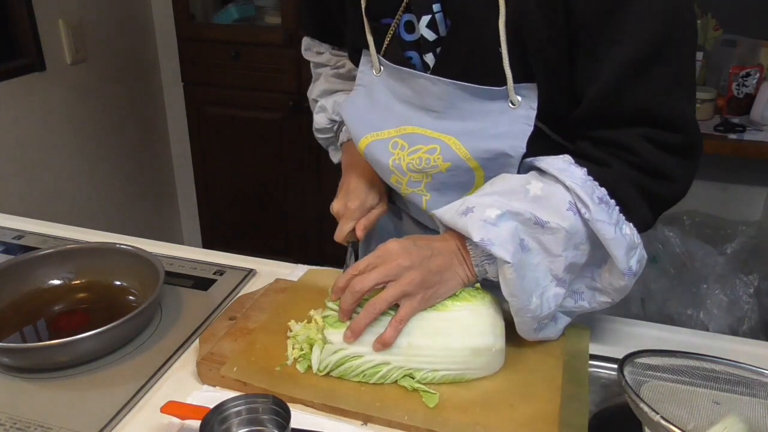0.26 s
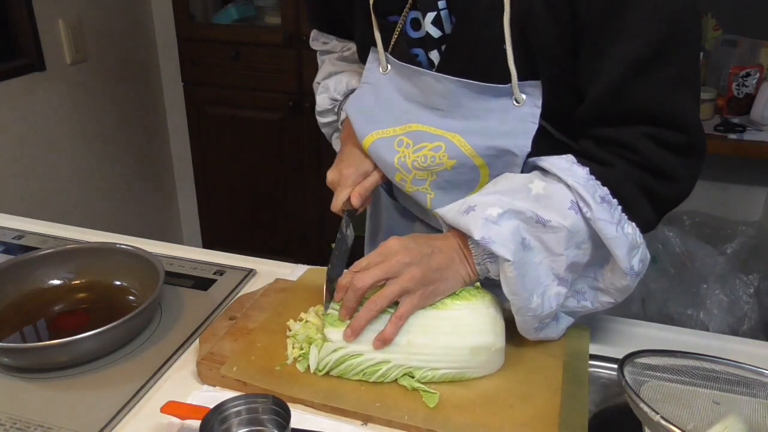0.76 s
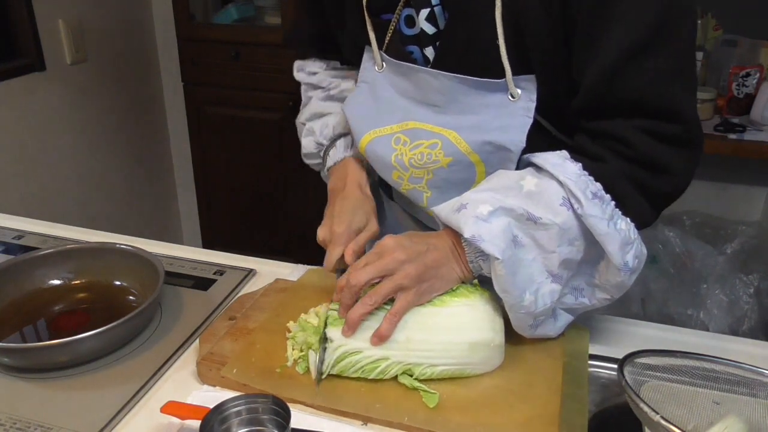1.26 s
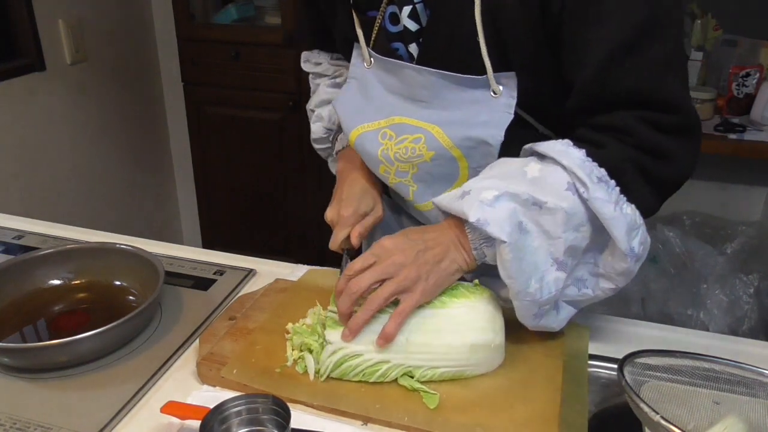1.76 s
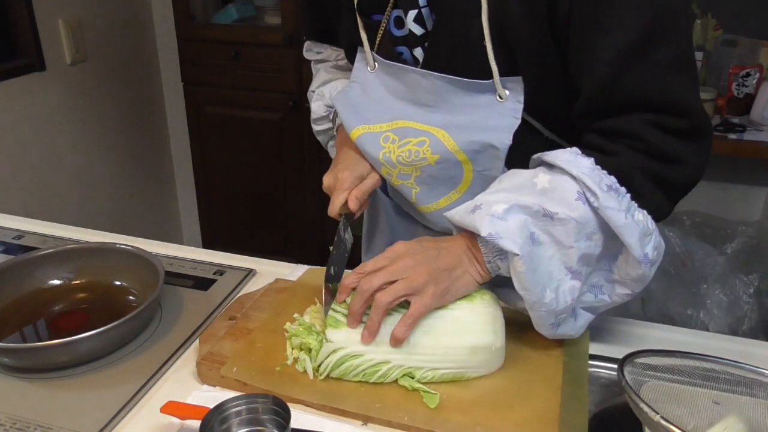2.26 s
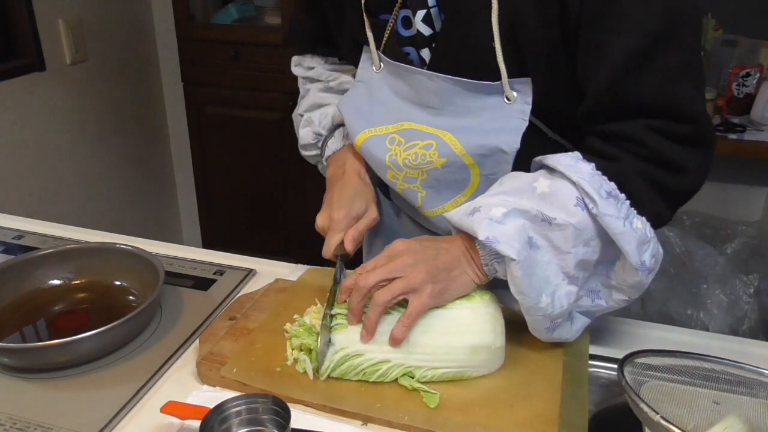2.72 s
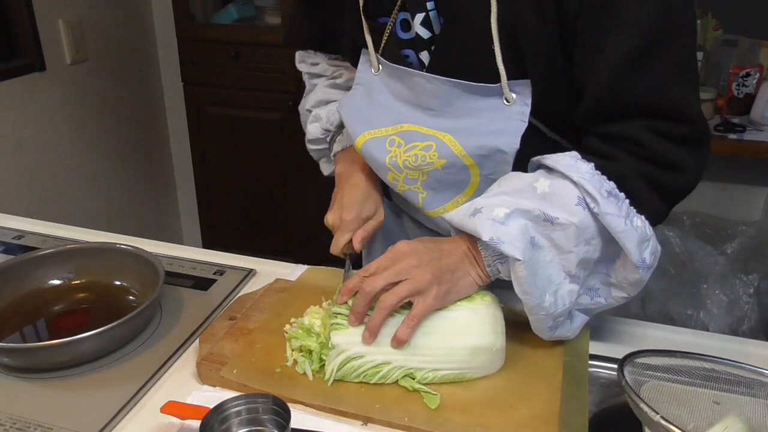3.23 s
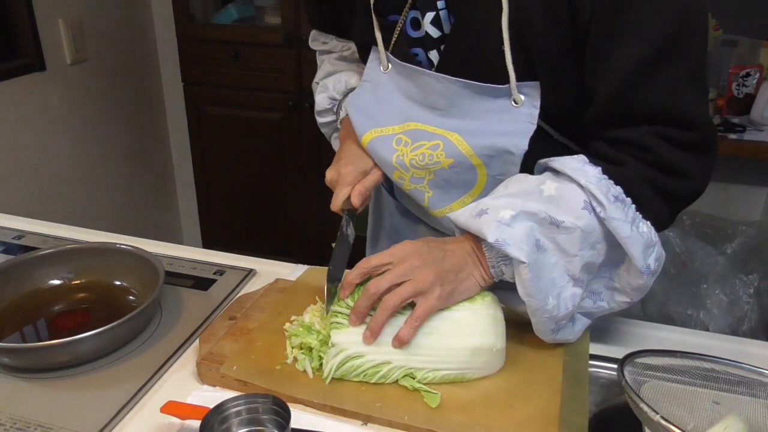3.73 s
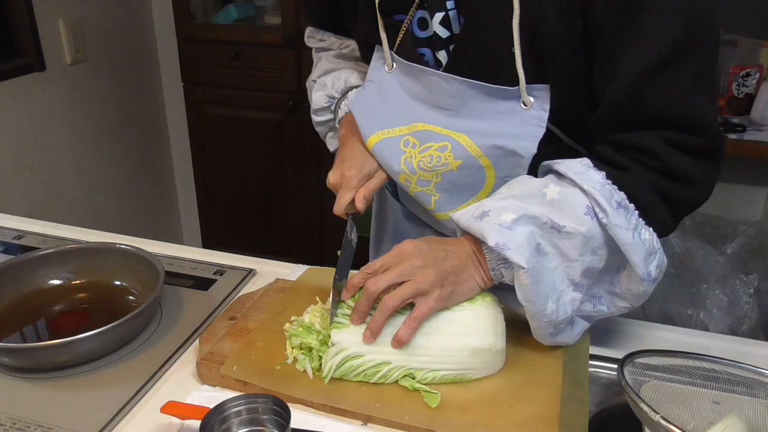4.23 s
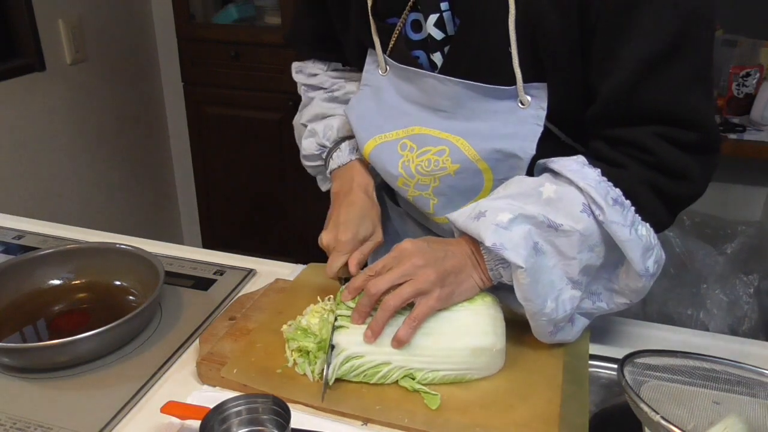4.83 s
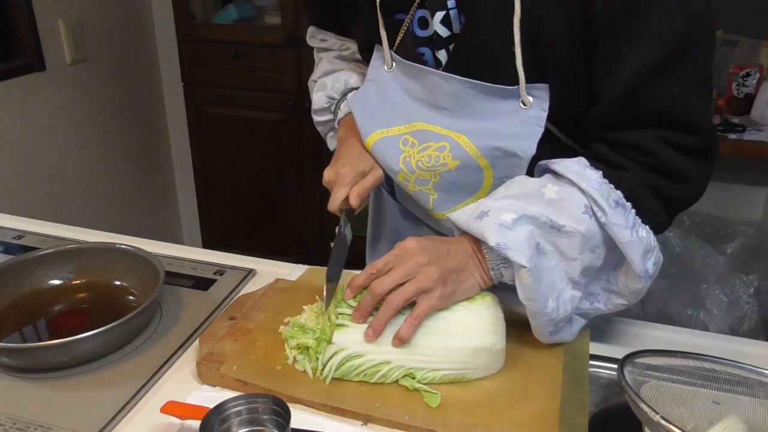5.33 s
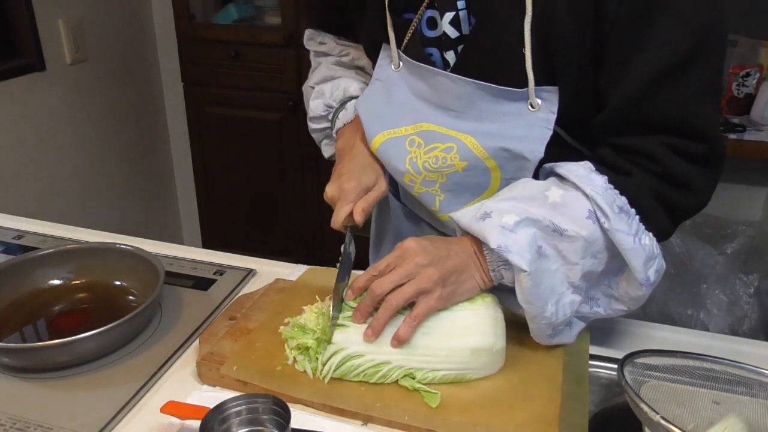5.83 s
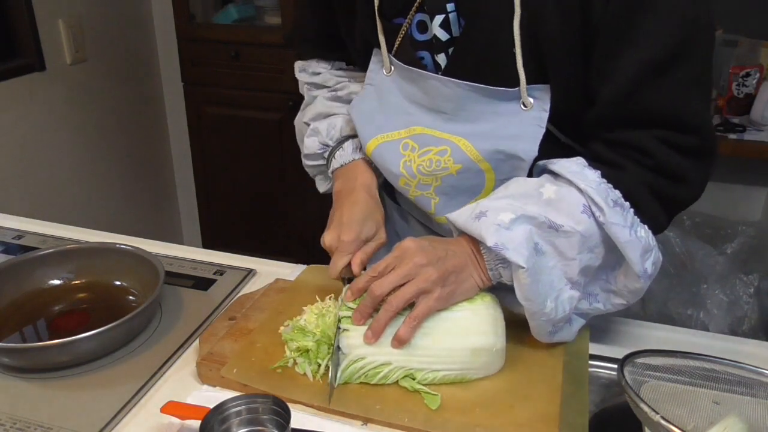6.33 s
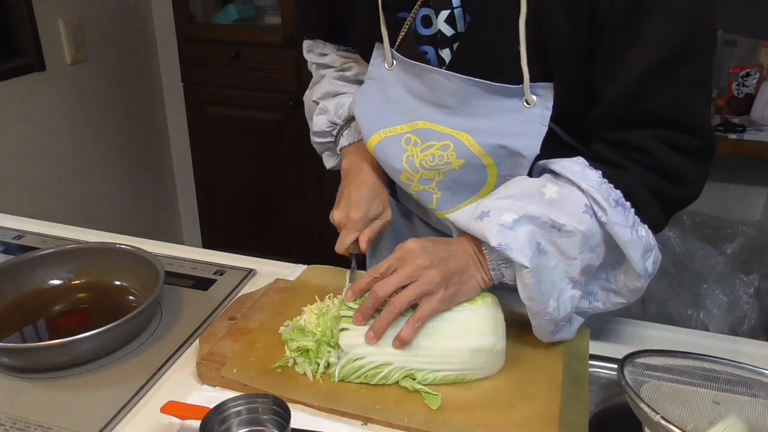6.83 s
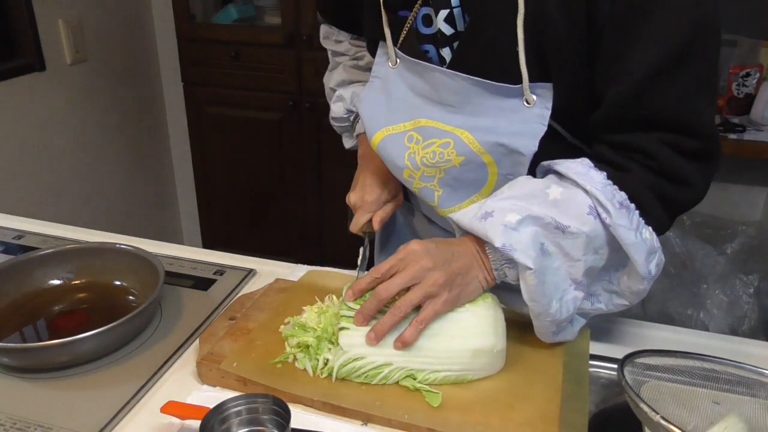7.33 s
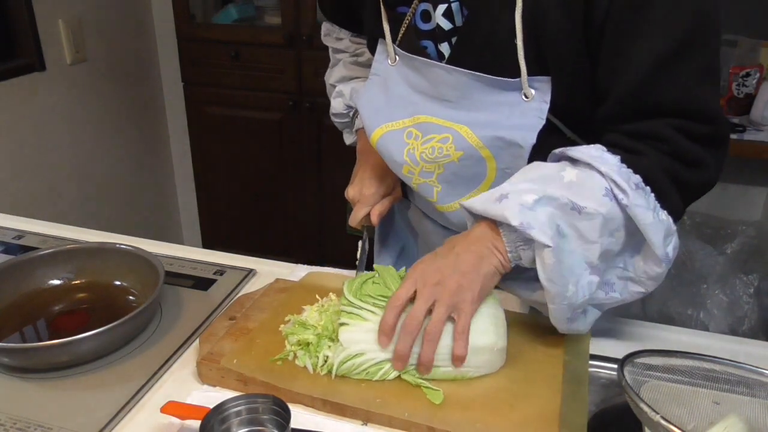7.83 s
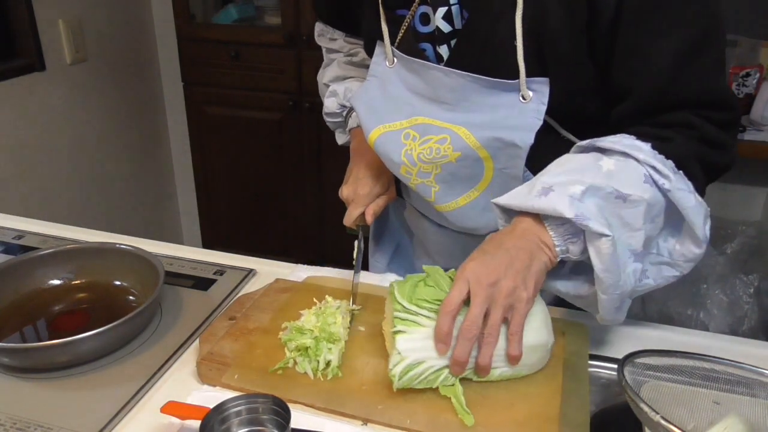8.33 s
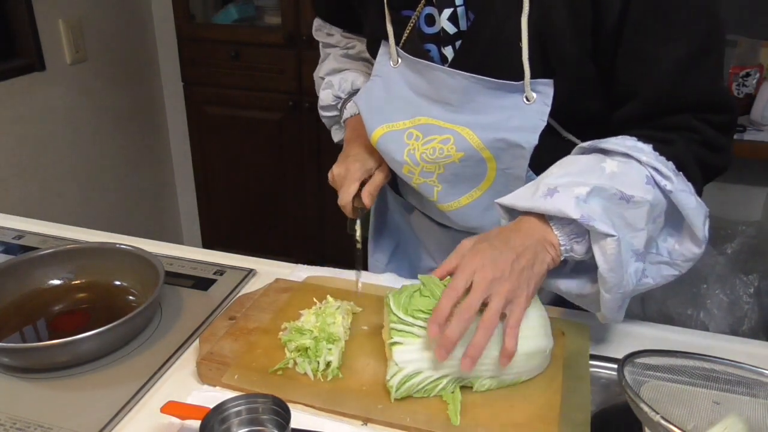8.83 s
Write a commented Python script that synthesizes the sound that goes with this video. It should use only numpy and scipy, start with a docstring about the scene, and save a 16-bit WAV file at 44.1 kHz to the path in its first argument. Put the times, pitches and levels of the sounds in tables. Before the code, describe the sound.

Close stereo view of cabbage being cut on a wooden board in a small, lightly reverberant kitchen, over a constant low ventilation rush with faint hiss. At 0-0.5 s a soft scrape and small squeaks, then scattered leaf crackles. The first slow stroke at 1.0-1.4 s is bright and crunchy, deepening into board rumble, with a muffled knock at 1.5. A dragging rustle leads to the second cut at 2.7-3.0, followed by a squeak and a scrape to 3.4. Quiet ticks and snaps precede the third, shorter cut at 4.5, ending in a loud, hard woody chop at 4.76. After a lull, the fourth long crunch runs 5.9-6.3. Rubbing, leaf snaps and low squeaks follow at 6.5-7.0, then a cluster of light knocks at 7.2-7.35. Faint rustling fades down, with a soft dull double tap near 8.7.

```python
"""A kitchen knife shreds a head of cabbage on a wooden board in four slow strokes, in a small kitchen.
Noise from random fractures, coloured per material, makes bursting cells, tearing ribs, rubbing and board rumble.
Single leaves snap as noise bursts; knocks are decaying board modes; squeaks and thuds are unsteady sines.
One stroke ends in a hard chop; then the head is pushed aside with a rustle and a few soft knocks.
Filtered noise echoes give counter and room; a steady low rush of ventilation lies underneath."""
import sys
import numpy as np
from scipy import signal
from scipy.fft import rfft, irfft, next_fast_len
from scipy.io import wavfile
from scipy.ndimage import map_coordinates

SR = 44100
rng = np.random.default_rng(int(sys.argv[2]) if len(sys.argv) > 2 else 0)


def log_audio(samples):
    """Write samples as a 16-bit WAV file to the path given in sys.argv[1]."""
    # one column per channel
    frames = np.atleast_2d(samples).T
    # limit to full scale, then quantise
    limited = np.clip(frames, -1, 1)
    pcm = np.round(limited * 32767).astype(np.int16)
    wavfile.write(sys.argv[1], SR, pcm)


N = 399987
TIME = np.arange(N) / SR
TOP_HZ = 15850


def amp(db):
    """Decibels to gain."""
    return np.exp(np.asarray(db) * (np.log(10) / 20))


def unit(x):
    """Scale to rms 1."""
    return x / np.sqrt(np.mean(x ** 2) + 1e-20)


def peaked(x):
    """Scale to peak 1."""
    return x / np.abs(x).max()


def along(points, hz):
    """Read (Hz, value) points on a log frequency axis."""
    f, v = np.transpose(points)
    return np.interp(np.log(hz + 1), np.log(f + 1), v)


def add(track, s, sound):
    """Mix a sound into a track at time s."""
    part = track[max(round(s * SR), 0):][:len(sound)]
    part += sound[:len(part)]


def wobble(rate, size):
    """Smooth random curve, rate knots per second."""
    knots = rng.standard_normal(int(size * rate / SR) + 4)
    return map_coordinates(knots, [np.arange(size) * rate / SR])


def filtered(x, response):
    """Apply a complex response of frequency to zero-padded x."""
    n = x.shape[-1]
    m = 2 * next_fast_len(n // 2 + 4096)
    return irfft(rfft(x, m) * response(np.fft.rfftfreq(m, 1 / SR)), m)[..., :n]


def coloured(x, spectrum):
    """Causal minimum-phase filter with the given spectrum."""
    def response(hz):
        cepstrum = irfft(np.log(amp(along(spectrum, hz))))
        fold = 1 + np.sign(np.fft.fftfreq(len(cepstrum)))
        return np.exp(rfft(cepstrum * fold))
    return filtered(x, response)


def resonating(x, peaks):
    """Parallel second-order resonances of alternating sign."""
    def response(f):
        total = 0
        for k, (centre, width, db) in enumerate(peaks):
            band = 1j * f * width
            total = total + (-1) ** k * amp(db) * band / (centre * centre - f * f + band)
        return total
    return filtered(x, response)


def envelope(s, rise, hold, sag, release):
    """Gain that rises from time s, sags while held, then dies; sag and release in dB/s."""
    gain, t = np.zeros(N), TIME[:SR]
    loss_db = sag * np.clip(t - rise, 0, hold) + release * np.maximum(t - rise - hold, 0)
    add(gain, s, np.minimum(t / rise, 1) * amp(-loss_db))
    return gain


def fractures(rate, spread_db, clump_db):
    """Tiny impulses of uneven size, clumped as the edge passes leaf after leaf."""
    happens = rng.random(N) < rate / SR
    size_db = spread_db * np.clip(rng.standard_normal(N), -2, 2) + clump_db * wobble(130, N)
    return happens * rng.choice([-1, 1], N) * amp(size_db)


# bursting cells and tearing ribs, relative spectra: [f/Hz, density/dB]
CELL_SPECTRUM = [(1500, -49), (4000, -21.5), (5800, -7.5), (7500, 1), (9300, 3.5), (11500, -0.5),
                 (14000, -6.5), (16000, -17)]
RIB_SPECTRUM = [(500, -11), (1200, -1), (1750, -1), (2900, 2), (4100, 4.5), (5500, -1), (8000, -5.5),
                (15000, -64)]
# resonances under the sliding blade and under its push on the board: [f/Hz, width/Hz, level/dB]
RUB_MODES = [(320, 70, -5), (510, 140, -1), (755, 70, -5), (885, 130, -1.5), (1130, 150, -3.5),
             (1335, 100, -4.5), (2065, 60, -5.5), (2590, 80, -15)]
PUSH_MODES = [(63, 16, -26), (89.3, 5, -6), (139.3, 25, 0.5), (151.9, 30.4, 2.5), (206.7, 74, -5),
              (234.8, 31.5, -4)]
FIBRE_DB = -7.5


def slicing():
    """Cells burst brightly, ribs tear lower, fibres tick, and the jerks of the blade shake the board."""
    cell_gain, rib_gain, rub_gain, push_gain = np.sqrt(cuts() ** 2 + drags() ** 2 + crunches() ** 2)
    bursts = fractures(rate=2500, spread_db=3.5, clump_db=2.0)
    tears = fractures(rate=1300, spread_db=4, clump_db=2)
    slips = fractures(rate=800, spread_db=1.5, clump_db=2.2)
    cell_noise = coloured(unit(bursts) + 0.5 * unit(tears), CELL_SPECTRUM)
    rib_noise = coloured(unit(tears) + 1.6 * unit(bursts), RIB_SPECTRUM)
    rub_noise = resonating(unit(slips) + 0.45 * unit(tears), RUB_MODES)
    push_noise = resonating(slips, PUSH_MODES)
    cells = amp(-1.5) * cell_gain * unit(cell_noise)
    ribs = amp(-3.0) * rib_gain * unit(rib_noise)
    rub = amp(-1.5) * rub_gain * unit(rub_noise)
    push = amp(-2.5) * push_gain * unit(push_noise)
    strings = amp(FIBRE_DB) * np.sqrt(rib_gain * rub_gain) * fibres()
    return cells + ribs + strings + rub + push


# the blade sinks through the head, relative levels:
# [t/s, time to board/s, bite height 0-1, level at board/dB,
#  extra crispness of outer leaves/dB, extra weight on board/dB]
CUTS = [(1.041, 0.38, 1, -37.5, 4.5, -2), (2.74, 0.27, 1, -36.5, -2, -1),
        (4.523, 0.222, .55, -39.5, -2, -2.5), (5.86, 0.425, 1, -38, -1, -1)]
# rows cells, ribs, rubbing, push on board: [relative level at board/dB, growth on the way down/dB, release/(dB/s)]
CUT_LAYERS = [(-1.5, 10, 404), (-4, 11, 366), (-3, 15, 352), (0.5, 16.5, 260)]
CUT_RISE_S = 0.0073


def cuts():
    """Gains of cells, ribs, rubbing and push: the deeper the blade, the harder it works and the duller it sounds."""
    power = np.zeros((4, N))
    for s, length, bite_height, db, crisp_db, weight_db in CUTS:
        height = bite_height * np.clip(1 - (TIME - s) / length, 0, 1)
        extras_db = [crisp_db * height, 0, 0, weight_db]
        for layer, (end_db, growth_db, release), extra_db in zip(power, CUT_LAYERS, extras_db):
            depth_gain = amp(db + end_db + extra_db - growth_db * height)
            layer += (depth_gain * envelope(s, CUT_RISE_S, length, 0, release)) ** 2
    return np.sqrt(power)


# blade or cabbage dragged over shreds and board, relative levels:
# [t/s, rise/s, hold/s, rubbing/dB, leaf cells/dB, push on board/dB]
DRAGS = [(0, 0.014, 0.43, -47.5, -47.5, -46.5), (0.05, 0.067, 0.095, -47, -58.5, -60),
         (1.635, 0.15, 0.073, -50.5, -50.5, -64), (2.526, 0.29, 0.12, -48.5, -41, -48),
         (3.141, 0.11, 0.13, -45, -47, -46.5), (4.354, 0.016, 0.16, -53, -51.5, -51),
         (5.05, 0.043, 0.0079, -57, -55.5, -59), (6.546, 0.27, 0.28, -46.5, -49, -48),
         (7.158, 0.13, 0.018, -47, -52, -49), (7.97, 0.033, 0.014, -58.5, -58.5, -72),
         (8.09, 0.09, 0.034, -60, -61.5, -73), (8.25, 0.057, 0.42, -64.5, -87, -62.5)]
DRAG_SAG_DB_PER_S, DRAG_RELEASE_DB_PER_S, DRAG_RIB_DB = 11, 107, -1


def drags():
    """The same four gains for a drag: one swell that eases off as the blade comes free."""
    power = np.zeros((4, N))
    for s, rise, hold, rub_db, cell_db, push_db in DRAGS:
        swell = envelope(s, rise, hold, DRAG_SAG_DB_PER_S, DRAG_RELEASE_DB_PER_S)
        rib_db = (cell_db + rub_db) / 2 + DRAG_RIB_DB
        power += np.outer(amp([cell_db, rib_db, rub_db, push_db]), swell) ** 2
    return np.sqrt(power)


# leaves crushed by the fingers or the edge, relative levels: [t/s, length/s, cells/dB, ribs/dB]
CRUNCHES = [(0.576, 0.053, -68, -69), (0.867, 0.24, -52, -58.5), (1.105, 0.013, -42, -53),
            (1.603, 0.054, -53, -56), (1.992, 0.062, -68, -65.5), (2.1, 0.01, -61, -65.5),
            (2.434, .09, -62, -71), (2.543, 0.048, -52, -64), (2.741, .01, -40.5, -44),
            (3.94, 0.042, -66, -68.5), (4.037, .04, -59, -67), (4.276, 0.024, -43.5, -58),
            (4.449, 0.014, -42.5, -46), (4.517, 0.013, -42, -42), (4.645, 0.03, -38.5, -45.5),
            (4.997, 0.053, -59, -61.5), (5.092, 0.026, -47, -53), (5.602, 0.16, -66, -82),
            (5.787, 0.19, -54.5, -62), (6.027, 0.01, -38, -43), (6.189, 0.022, -35.5, -41.5),
            (6.39, 0.75, -52.5, -60), (6.807, .03, -50, -47.5), (7.028, .015, -63, -53),
            (7.38, 0.16, -65, -64), (7.522, 0.054, -56, -54), (7.612, 0.048, -63, -50),
            (7.725, 0.073, -60.5, -68), (7.872, 0.088, -65, -70), (8.501, 0.27, -70, -70)]
CRUNCH_RISE_S, CRUNCH_SAG_DB_PER_S, CRUNCH_RELEASE_DB_PER_S = 0.017, 7, 251
# after each cut the fresh slice topples onto the heap
TOPPLE_DELAY_S, TOPPLE_S, TOPPLE_CELLS_DB, TOPPLE_RIBS_DB = 0.079, 0.12, -67, -63.5


def crunches():
    """The same four gains for crushed leaves and toppling slices: only cells and ribs sound, the board stays still."""
    power = np.zeros((4, N))
    topples = []
    for s, length, *_ in CUTS:
        topples.append((s + length + TOPPLE_DELAY_S, TOPPLE_S, TOPPLE_CELLS_DB, TOPPLE_RIBS_DB))
    for s, length, cell_db, rib_db in list(CRUNCHES) + topples:
        squeeze = envelope(s, CRUNCH_RISE_S, length, CRUNCH_SAG_DB_PER_S, CRUNCH_RELEASE_DB_PER_S)
        power[:2] += np.outer(amp([cell_db, rib_db]), squeeze) ** 2
    return np.sqrt(power)


FIBRES_PER_S, FIBRE_LOW_HZ, FIBRE_HIGH_HZ = 330, 650, 3000
FIBRE_CYCLES, FIBRE_SPREAD_DB = 9, 7  # cycles per 60 dB of decay; spread is plus or minus


def fibres():
    """Stringy fibres part one by one: woody ticks, each with its own pitch, together of rms 1."""
    t, count = TIME[:SR // 50], int(FIBRES_PER_S * N / SR)
    when, pitch, size = rng.random((count, 3)).T[:, :, None]
    cycles = t * FIBRE_LOW_HZ * (FIBRE_HIGH_HZ / FIBRE_LOW_HZ) ** pitch
    level_db = FIBRE_SPREAD_DB * (2 * size - 1) - 60 * cycles / FIBRE_CYCLES
    ticks = amp(level_db) * np.sin(2 * np.pi * cycles)
    where = (when * N).astype(int) + np.arange(len(t))
    return unit(np.bincount(where.ravel(), ticks.ravel(), N)[:N])


# single leaves snapping: [t/s, relative peak level/dB, relative rib share/dB]
SNAPS = [(0.435, -27, 5), (0.664, -42, -5), (0.756, -42, -9), (0.787, -38.5, -11), (0.8103, -32, -11),
         (0.8646, -28, -9), (0.908, -29, -14), (1.048, -23.5, -15), (1.068, -21, -15), (1.127, -20.5, -22),
         (1.236, -21, -15), (1.6415, -26, -18), (2.3996, -40, -16), (2.692, -25, -14), (2.4289, -37, -21),
         (2.75, -16.5, -12), (2.8895, -17.5, -13), (3.1907, -26.5, -25), (3.606, -39.5, -7),
         (3.964, -41, -14), (3.995, -37.5, -17), (4.0765, -32.5, -22), (4.2852, -24, -30),
         (4.2905, -26, -30), (4.365, -25.5, -17), (4.396, -28, -20), (4.531, -23, -2), (4.577, -30, -16),
         (4.693, -22, -20), (4.957, -41, -18), (5.47, -42, -14), (5.53, -41.5, -1), (5.6132, -32.5, -16.5),
         (5.714, -41, -28), (6.186, -25, -10), (5.8645, -28, -18), (6.68, -25, -15), (6.551, -27, -2),
         (6.5963, -27.5, -17), (6.657, -23.5, -11), (7.054, -29, 6), (7.565, -32.5, -4), (7.927, -40.5, -9),
         (8.221, -38, 7), (8.3544, -42.5, 9), (8.724, -44, -10)]


def snaps(t60=0.012, level_db=-3.5, rib_lift_db=4):
    """A whole leaf gives way: a sharp crack and a few milliseconds of splitting."""
    track, t = np.zeros(N), TIME[:SR // 20]
    for s, db, rib_db in SNAPS:
        decay = amp(-60 * t / t60) + 1.17 * amp(-60 * t / 0.0078)
        split = rng.standard_normal(len(t)) * decay
        cells = unit(coloured(split, CELL_SPECTRUM))
        ribs = amp(rib_db + rib_lift_db) * unit(coloured(split, RIB_SPECTRUM))
        add(track, s, amp(db + level_db) * peaked(cells + ribs))
    return track


# blade and cabbage meeting the board:
# [t/s, ring level/dB, strongest f/Hz, mode pitch factor, click re ring/dB,
#  click t60/s, click top f/Hz, crushed leaf re ring/dB]
KNOCKS = [ (1.4865, -27, 1300, .97, -32, .01, 3000, -15), (6.266, -31, 900, .94, -20, .019, 9000, -3),
          (6.549, -46, 3000, 1, 4, .019, 9000, -6), (6.659, -43, 700, .93, -14, .019, 9000, 0),
          (4.7542, -19, 900, 1, 6, .004, 13000, -8), (4.7568, -3.8, 1250, 1, -10, .017, 11000, -20),
          (4.7585, -37, 1400, 1, 20, .005, 12000, 0), (7.189, -31, 520, .95, 2, .017, 13000, -1),
          (7.224, -35.5, 674, .9, 7, .019, 13000, 3), (7.294, -30, 2000, 1, 2, .015, 11000, -1),
          (7.3075, -29, 1900, .97, -8, .019, 11000, 0), (7.314, -34, 930, .95, -20, .019, 6000, 0),
          (7.351, -47, 2000, 1, -6, .019, 9000, 9), (7.772, -48, 900, .97, 7, .022, 12000, 3),
          (8.463, -45, 950, .97, -16, .015, 4000, -2), (8.6889, -32.5, 700, .85, -4, .02, 2700, -1),
          (8.694, -37, 420, .85, -8, .04, 11000, 0)]
# board with the blade on it, before the pitch factor: [f/Hz, relative level/dB, t60/s]
BOARD_MODES = [(135, -14, .06), (200, 4, .05), (340, -15, .04), (525, -8.5, .042), (800, -14, .026),
               (968, -5, .032), (1128, -10, .026), (1360, -1.5, .03), (1625, -17, .02), (2035, -16, .04),
               (2345, -21, .025), (2527, -13, .025), (3205, -14, .022), (3490, -17, .018)]
# edge click, relative spectrum: [f/Hz, density/dB]
CLICK_SPECTRUM = [(40, -50), (200, -12), (1000, -10.5), (3000, -1.5), (5000, -4), (9000, 0), (11500, -1),
                  (13500, -8), (15500, -16)]


def knocks(focus_db=7, soft_click_db=-10, softening=1.0, attack=0.00028, crush_t60=0.031):
    """Each contact clicks, crushes leaf and rings the board; soft ones favour its low modes, hard ones its high modes."""
    track, t = np.zeros(N), TIME[:SR // 4]
    free_hz, level, t60 = np.transpose(BOARD_MODES)[:, :, None]
    for s, db, centre_hz, pitch, click_db, click_t60, top_hz, crush_db in KNOCKS:
        hz = pitch * free_hz
        octaves = np.log2(hz / centre_hz)
        # a contact cushioned by leaves barely clicks and drives the upper modes less
        cushion_db = softening * max(soft_click_db - click_db, 0) * np.maximum(octaves, 0)
        scatter_db = 0.5 * rng.standard_normal(hz.shape)
        strength = level + scatter_db - focus_db * np.hypot(1, octaves) - cushion_db
        modes = amp(strength - 60 * t / t60) * np.sin(2 * np.pi * hz * t)
        ring = np.sum(modes, axis=0) * (1 - np.exp(-t / attack))
        click = coloured(rng.standard_normal(len(t)) * amp(-60 * t / click_t60), CLICK_SPECTRUM)
        click = signal.lfilter(*signal.butter(2, min(top_hz, TOP_HZ), fs=SR), click)
        band = [(centre_hz, 0.6 * centre_hz, 0)]
        crush = rng.standard_normal(len(t)) * amp(-60 * t / crush_t60)
        crush = resonating(resonating(crush, band), band)
        contact = peaked(ring) + amp(click_db) * peaked(click) + amp(crush_db) * peaked(crush)
        add(track, s, amp(db) * contact)
    return track


# blade lurching down through thick ribs: [t/s, rise/s, hold/s, f/Hz, level/dB]
THUDS = [(1.255, .015, .025, 100, -43), (1.372, .02, .04, 165, -37.5), (1.487, .008, .025, 135, -42),
         (2.93, .04, .03, 175, -35), (3.34, .02, .03, 170, -42), (4.524, .01, .01, 170, -46),
         (4.56, .06, .12, 88, -49), (6.208, .014, .04, 136, -32)]
THUD_RELEASE_DB_PER_S = 197


def thuds(rough=0.17, flutter_db=2.0):
    """The blade lurches through thick ribs and the board shudders under it: a low swell that dies smoothly."""
    track = np.zeros(N)
    for s, rise, hold, hz, db in THUDS:
        swell = envelope(0, rise, hold, 0, THUD_RELEASE_DB_PER_S)[:SR // 2]
        pitch = hz * (1 + rough * wobble(130.7, len(swell)))
        phase = 2 * np.pi * np.cumsum(pitch) / SR
        level = amp(db + flutter_db * wobble(110.6, len(swell)))
        add(track, s, swell * level * np.sin(phase))
    return track


# wet blade or cabbage sticking and slipping: [t/s, length/s, first f/Hz, last f/Hz, level/dB, roughness 0-1]
SQUEAKS = [(.08, .06, 690, 930, -47, .05), (.175, .04, 980, 920, -45, .04), (1.69, .13, 128, 152, -50, .05),
           (1.768, .055, 890, 760, -43.5, .055), (1.80, .04, 1380, 1200, -48, .06),
           (1.82, .07, 880, 850, -52, .1), (2.75, .06, 870, 820, -45, .07),
           (2.97, .06, 1050, 850, -40, .12), (5.046, .036, 855, 885, -42.5, .015),
           (6.765, .06, 370, 325, -44, .04), (6.825, .04, 410, 380, -46, .04),
           (6.86, .1, 345, 322, -43.5, .02), (7.02, .035, 1140, 1180, -48, .02),
           (8.12, .14, 900, 1000, -56, .12), (8.72, .2, 950, 850, -61, .22)]


def squeaks(flutter_db=3, overtone_db=-19):
    """Wet leaf grips the steel and lets go at an unsteady, gliding rate."""
    track = np.zeros(N)
    for s, length, first_hz, last_hz, db, rough in SQUEAKS:
        u = np.minimum(TIME[:SR // 4] / length, 1)
        glide_hz = first_hz + (last_hz - first_hz) * u
        phase = 2 * np.pi * np.cumsum(glide_hz * (1 + rough * wobble(212, len(u)))) / SR
        level = amp(db + flutter_db * wobble(133, len(u)))
        swell = np.sqrt(np.abs(np.sin(np.pi * u))) * level
        add(track, s, swell * (np.sin(phase) + amp(overtone_db) * np.sin(2 * phase)))
    return track


# free blade: [f/Hz, relative level/dB]
STEEL_MODES = [(7908, -1), (9125, -7), (9776, -5), (10500, -4), (11970, -8), (13000, -8)]
# light brushes against it: [t/s, relative level/dB]
TINGS = [(2.278, -54), (4.285, -43)]


def tings(attack=0.0045, t60=0.13):
    """The lifted blade is brushed and rings thinly, its modes wavering in phase."""
    track, t = np.zeros(N), TIME[:SR // 4]
    for s, db in TINGS:
        ring = np.zeros(len(t))
        for hz, level in STEEL_MODES:
            ring += amp(level) * np.sin(2 * np.pi * hz * t + 0.6 * wobble(410, len(t)))
        add(track, s, amp(db - 60 * t / t60) * (1 - np.exp(-t / attack)) * ring)
    return track


SETTLE_PER_S, SETTLE_DB = 25, -79


def settling():
    """Loose shreds settle all the while: faint stray ticks from the heap."""
    ticks = fractures(rate=SETTLE_PER_S, spread_db=3, clump_db=2)
    return amp(SETTLE_DB) * unit(coloured(ticks, CELL_SPECTRUM))


# hollow ring under the board: [f/Hz, width/Hz, relative level/dB, t60/s]
WORKTOP_MODES = [(220, 220, -7, .75), (460, 200, -10, .75), (970, 250, -1.5, .68), (1360, 160, -8, .55),
                 (2020, 260, -15.5, .78), (2600, 600, -17, .75)]


def worktop(ring_db=-26, focus_db=6, best_hz=1000, rise=0.006):
    """Blows on the board leave a hollow ring in the worktop; the nearer to its main pitch, the stronger."""
    track, t = np.zeros(N), TIME[:3 * SR // 4]
    for s, db, centre_hz, *_ in KNOCKS:
        noise = rng.standard_normal(len(t))
        ring = np.zeros(len(t))
        for hz, width, level, t60 in WORKTOP_MODES:
            band = [(hz, width, 0)]
            mode = unit(resonating(resonating(noise, band), band))
            ring += amp(level - 60 * t / t60) * mode
        mismatch_db = focus_db * np.log2(centre_hz / best_hz) ** 2
        add(track, s, amp(db + ring_db - mismatch_db) * (1 - np.exp(-t / rise)) * ring)
    return track


# diffuse sound: [f/Hz, left-right likeness 0-1]
LIKENESS = [(60, 0.79), (160, 0.94), (280, 0.36), (900, 0.43), (2000, 0.29), (10000, 0)]


def diffuse(size):
    """Stereo noise from all sides: alike in the bass, unrelated in the treble."""
    def mid_side(hz):
        turn = np.arccos(np.clip(along(LIKENESS, hz), -1, 1)) / 2
        return np.array([np.cos(turn), np.sin(turn)])
    mid, side = filtered(rng.standard_normal((2, size)), mid_side)
    return np.array([mid + side, mid - side])


# early answer of the counter: [f/Hz, level/dB]
COUNTER_SPECTRUM = [(150, -3.5), (1300, -2), (3000, 0.5), (7000, 0.5), (14000, 1.5)]


def counter(x, t60=0.07, rise=0.0006):
    """Counter and cupboards answer at once: short decaying noise echoes, a fresh pattern every 1/30 s."""
    wet, hop = np.zeros((2, N)), SR // 30
    t = TIME[:hop]
    shape = amp(-60 * t / t60) * (1 - np.exp(-t / rise))
    echoes = coloured(diffuse(N + hop), COUNTER_SPECTRUM)
    for start in range(0, N, hop):
        for ear in range(2):
            pattern = echoes[ear, start:start + hop] * shape / np.linalg.norm(shape)
            add(wet[ear], start / SR, signal.fftconvolve(x[start:start + hop], pattern))
    return wet


# room decay: [f/Hz, t60/s]
KITCHEN_T60 = [(100, 0.4), (400, 0.69), (700, 0.72), (1000, 0.45), (1400, 0.52), (2400, 0.3), (6000, 0.31),
               (14000, 0.26)]
# room answer: [f/Hz, level/dB]
KITCHEN_SPECTRUM = [(150, -9), (500, -11), (750, -11), (1000, -9), (1380, -14), (2000, -7), (2700, -6.5),
                    (4000, -9), (9000, -10)]


def kitchen(x, rise=0.0038):
    """The room rings on for up to half a second: noise tails decaying per band, a fresh pattern every 0.25 s."""
    wet, hop, t = np.zeros((2, N)), SR // 4, TIME[:SR // 2]
    for start in range(0, N, hop):
        hz, frames, z = signal.stft(diffuse(len(t)), SR, nperseg=256)
        decay = amp(-60 * frames / along(KITCHEN_T60, hz)[:, None])
        tail = signal.istft(z * decay, SR, nperseg=256)[1][:, :len(t)]
        tail = tail * (1 - np.exp(-t / rise))
        for ear in range(2):
            pattern = tail[ear] / np.linalg.norm(tail[ear])
            add(wet[ear], start / SR, signal.fftconvolve(x[start:start + hop], pattern))
    return coloured(wet, KITCHEN_SPECTRUM)


# ventilation, relative spectrum: [f/Hz, density/dB]
HUSH_SPECTRUM = [(15, -8), (55, -9.5), (85, 0.5), (160, 4), (290, 0), (420, -5), (850, -5), (1200, -7.5),
                 (1700, -19), (2600, -22.5), (5500, -23), (8800, -21), (12500, -23.5), (15500, -28)]
HUSH_DB = -57


def room_tone():
    """Steady low rush of ventilation with a faint hiss above it: coloured diffuse noise."""
    return amp(HUSH_DB) * unit(coloured(diffuse(N), HUSH_SPECTRUM))


# the small board radiates little bass: [f/Hz, level/dB]
BOARD_RADIATION = [(20, -40), (60, -24), (130, -8), (250, -2)]


def scene():
    """The work on the board, heard in the kitchen."""
    board = coloured(knocks(), BOARD_RADIATION)
    work = slicing() + snaps() + settling() + board + squeaks() + tings()
    shudder = thuds()
    direct = work + shudder + worktop()
    return direct + counter(work) + kitchen(work + shudder) + room_tone()


def record(dry):
    """The right microphone is a little brighter; nothing passes above the band limit."""
    def response(hz):
        lean_db = along([(4000, 0.034), (8000, 0.48), (13000, 1.0)], hz)
        return amp([-lean_db, lean_db]) * (hz < TOP_HZ)
    return filtered(dry, response)


dry = scene()
out = record(dry)
log_audio(out)
```